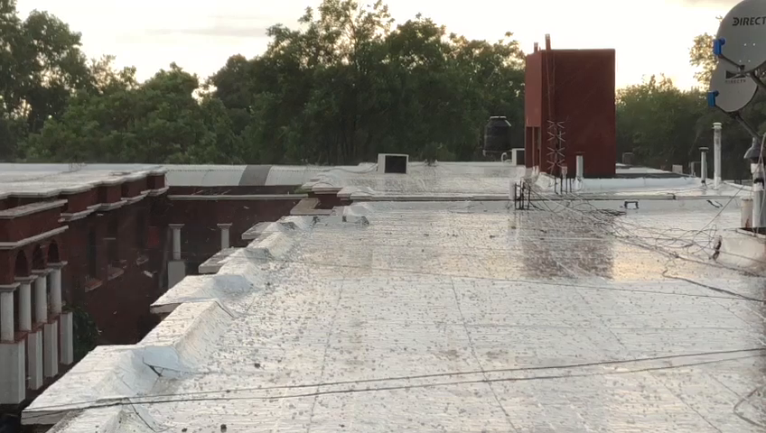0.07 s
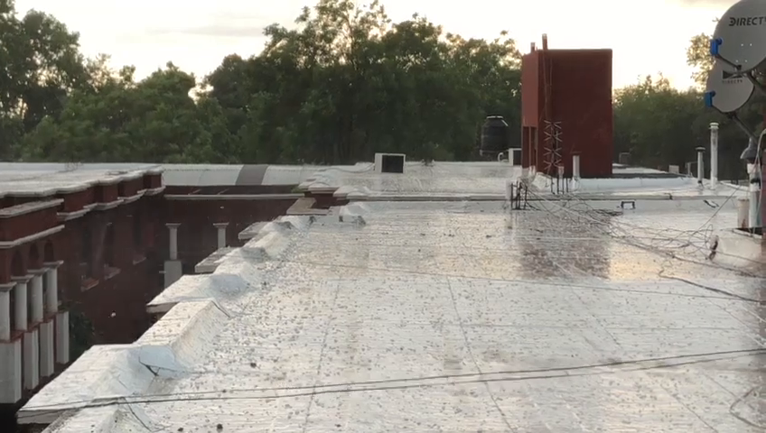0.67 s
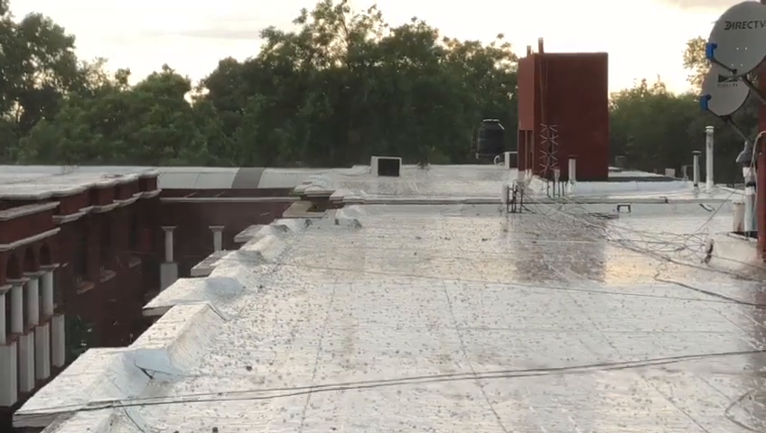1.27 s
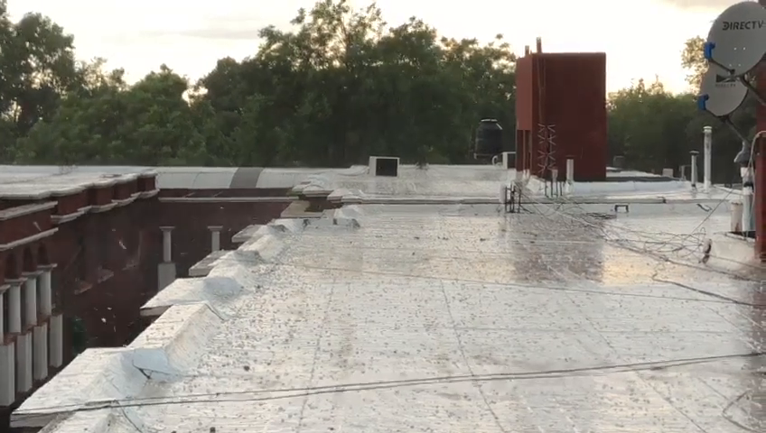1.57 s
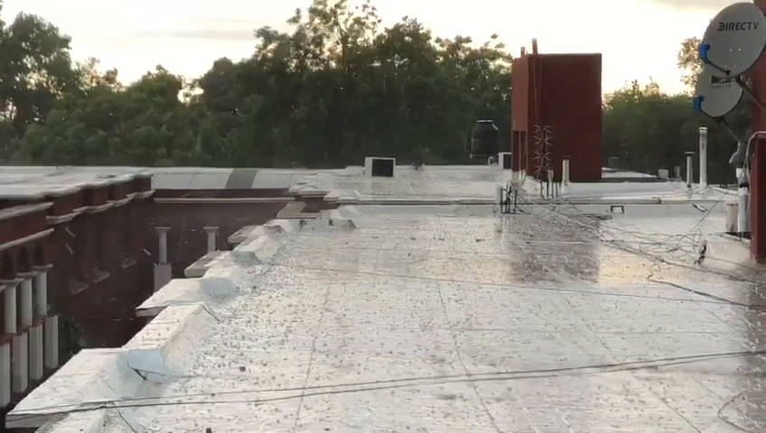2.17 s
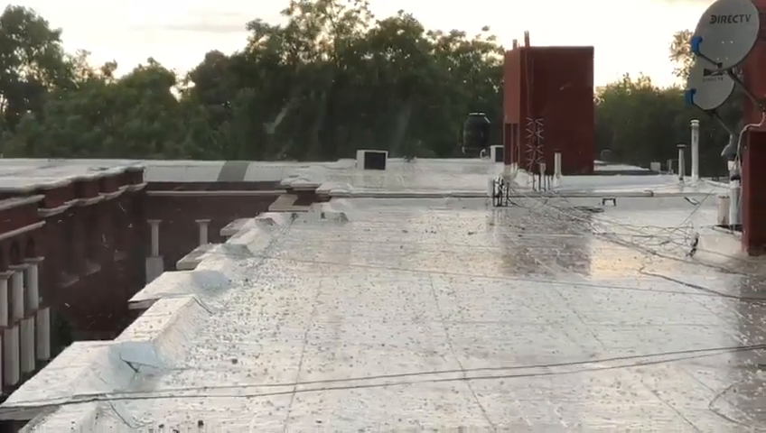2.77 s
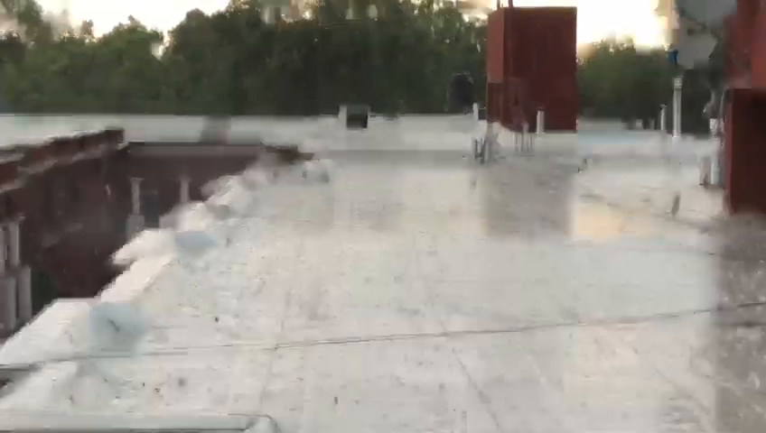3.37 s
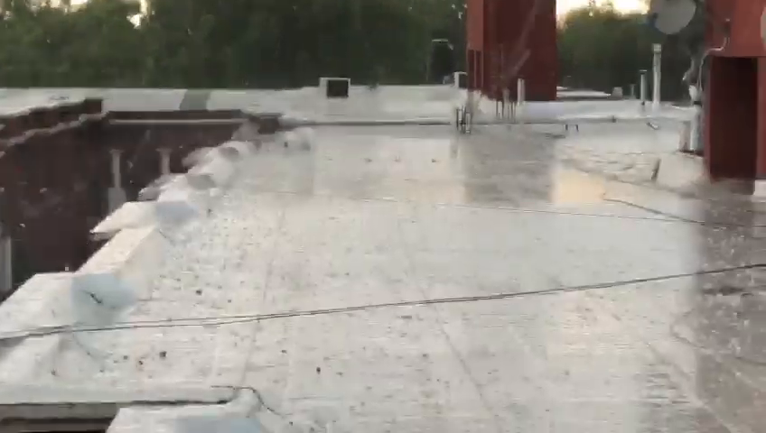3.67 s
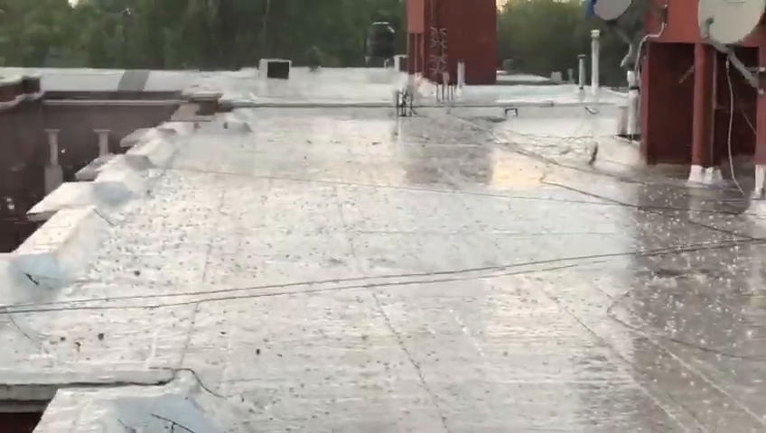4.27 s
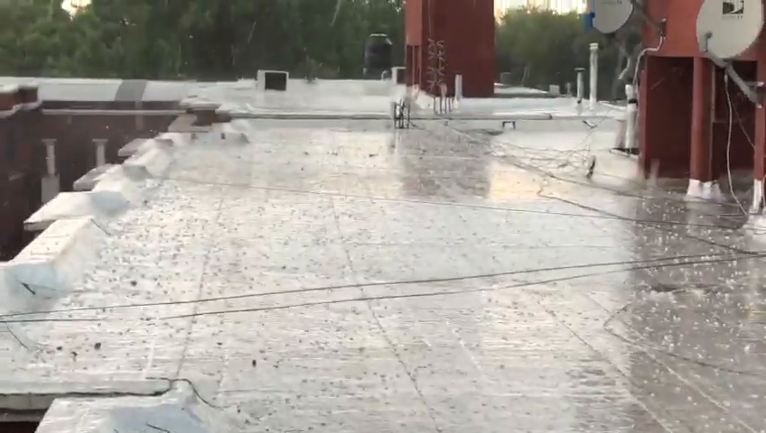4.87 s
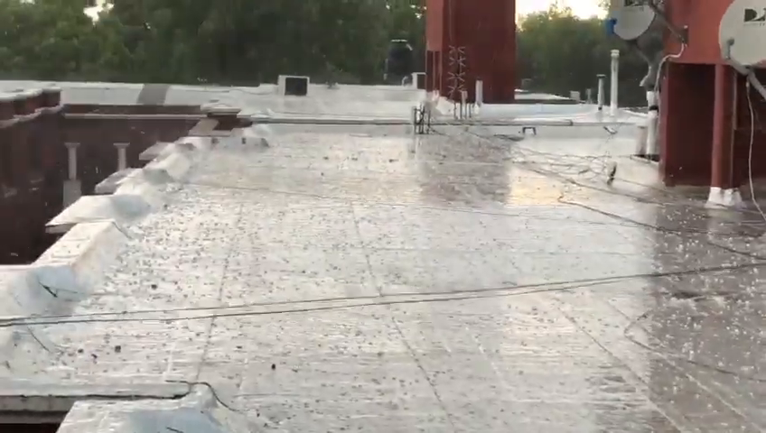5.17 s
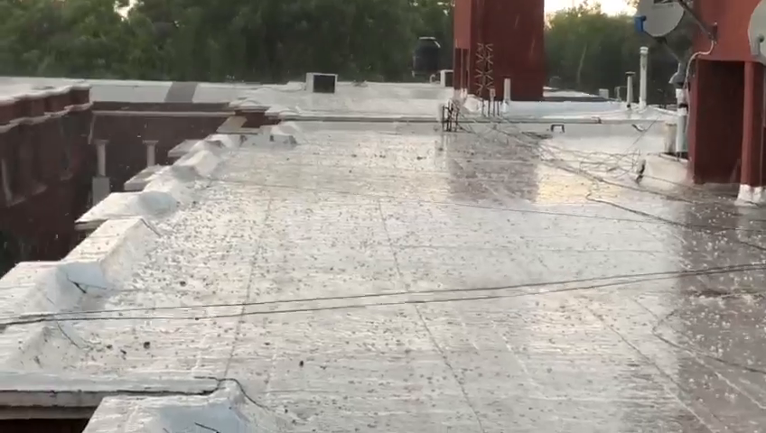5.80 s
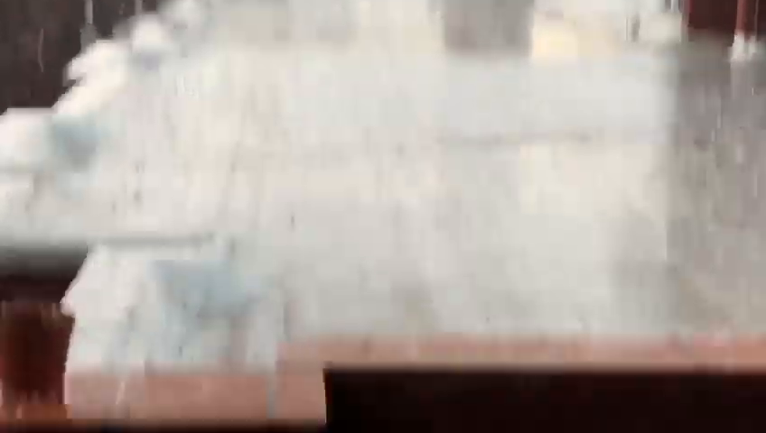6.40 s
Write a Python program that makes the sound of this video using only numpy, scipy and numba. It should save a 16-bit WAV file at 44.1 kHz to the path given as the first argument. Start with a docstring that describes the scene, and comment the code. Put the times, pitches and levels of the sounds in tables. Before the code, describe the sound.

Heavy rain and hail beat on a flat roof, with stones booming on thin sheet metal and wind buffeting the microphone.

```python
"""Heavy rain and hail on a flat roof, heard from shelter at its edge. From the start, far drops merge
into a wash, near ones patter and hailstones crack on the roofing; from 0.5 s big stones boom on a thin
metal sheet. At 1.8 s one clangs on a metal fitting. At 3.2-3.9 s the microphone turns, recolouring the
wash. Wind then buffets it, hardest near 4 s, and eases by 6 s. Gain control ducks after heavy blows."""
import sys
import numpy as np
from scipy import signal
from scipy.fft import rfft, irfft
from scipy.io import wavfile
from scipy.ndimage import uniform_filter1d, minimum_filter1d
from numba import njit

SR = 44100
rng = np.random.default_rng(int(sys.argv[2]) if len(sys.argv) > 2 else 0)


def master(y):
    """Save y as 16-bit WAV."""
    cut = np.clip(np.atleast_2d(y).T, -1, 1)
    pcm = np.round(cut * 32767)  # scale
    wavfile.write(sys.argv[1], SR, pcm.astype(np.int16))


N = 288414
TIME_S = np.arange(N) / SR
RING_S = np.arange(int(.55 * SR)) / SR  # time since a blow

# downpour strength: time_s, level_db
DOWNPOUR = [(0.3, -24), (0.7, -25), (1.05, -24), (1.5, -28.5), (2.2, -26), (2.6, -24), (3.3, -24.5),
            (3.8, -22.5), (4.55, -23), (5.55, -23.5), (6.15, -27), (6.54, -25.5)]
# microphone turn: time_s, turned_share
MIC_TURN = [(3.2, 0.15), (3.9, 0.63)]
# wash spectrum, microphone unturned: freq_hz, density_db
WASH_SPECTRUM = [(60, 8), (180, -1), (300, 1.5), (500, -1), (900, 1), (1400, -0.5), (2000, -1.5),
                 (2700, -2.5), (3700, -2), (5000, -9.5), (8000, -13), (12000, -23)]
# wash spectrum, microphone fully turned: freq_hz, density_db
WASH_TURNED_SPECTRUM = [(60, -19), (180, 8), (300, 7.5), (500, 1), (950, 2.5), (1400, -3), (2000, -6.5),
                        (2650, -1), (3700, -21), (5000, -18), (8000, -18), (12000, -20.5)]
# near spray spectrum: freq_hz, density_db
SPRAY_SPECTRUM = [(1000, -33), (3000, 0), (4500, 4.5), (7000, 0.5), (10000, -1), (12000, -7)]
# nearest stones on the roofing: start_s, level_db, pitch_hz, decay_s
ROOF_HITS = [(0.164, -6, 3900, 0.00045), (0.23, -12, 3200, 0.02), (0.402, -12.5, 5000, .002),
             (0.607, -12, 3000, 0.0053), (0.657, -8, 3630, 0.0055), (0.805, -10.5, 3470, .004),
             (1.018, -7, 4300, 0.0036), (1.042, -5.5, 4500, 0.0064), (1.110, -7, 4400, .004),
             (1.318, -1, 2760, 0.0021), (2.261, -4, 5040, .002), (3.046, -11, 4000, 0.038),
             (3.084, -25, 4500, 0.0034), (3.171, -8, 1970, 0.034), (3.431, -10, 2930, 0.014),
             (3.532, -4, 4300, 0.0033), (3.596, -10.5, 5630, 0.015), (3.921, -7, 3000, .014),
             (4.581, -6, 1910, 0.0083), (5.035, -9, 4170, 0.0026), (5.344, -8.5, 5000, 0.0005),
             (5.56, -10, 2620, 0.01), (5.691, -8, 4500, 0.011), (5.994, -8.5, 2610, 0.0026)]
# stones on the sheet: start_s, level_db, tilt_db_per_octave
SHEET_BLOWS = [(0.485, -15.5, -0.2), (0.975, -7.5, -3), (1.157, -6.5, -3), (2.406, -6.5, -2),
               (2.795, -11.5, 0.5), (3.022, -16.5, -4), (3.797, -6.5, -1.5), (4.094, -11, -2),
               (4.198, -13, 0), (4.906, -11.5, 0), (5.062, -17, 0.5), (5.298, -12.5, -0.2),
               (5.574, -6.5, -4.5), (5.717, -7, -1.5), (5.974, -16.5, -1), (5.995, -13, -2),
               (6.454, -16, -2)]
# spectrum of the sheet's crowded modes: freq_hz, density_db
SHEET_SPECTRUM = [(80, -20), (130, -3), (180, -16.5), (240, 2), (340, -3.5), (480, -6.5), (620, -7),
                  (800, -9.5), (1250, -11), (2000, -20.5), (4000, -27), (8000, -29)]
# strongest sheet modes: freq_hz, level_db
SHEET_MAIN_MODES = [(131, -2.5), (224, 1), (243, 2.5), (256, 4), (286, -28), (317, -4), (329, 2), (369, -2),
                    (403, -3), (453, -5), (520, -6.5), (691, -4.5)]
# fitting modes: freq_hz, level_db, t60_s
CLANG_MODES = [(238.4, -0.5, 0.87), (344, -2, 0.45), (355, -4, 0.57), (719, -8, 1.28), (1320, -14, 0.38),
               (1313, -8, 0.61), (1400, -8, 0.68), (1574, -6, 0.38), (1776, -5, 0.54), (2500, -12.5, 0.64),
               (2627, -11, 0.47), (3220, -10, 0.56), (3690, 5.5, 0.077), (3990, -1, 0.26), (4310, -8, 0.34),
               (5243, -23, 0.32), (6072, -12, 0.47), (6228, -17, 0.35), (7400, -21, .22), (8150, -16, 0.38)]
# low rumble, thump of heavy sheet blows near 1.1 s, wind gusts later: time_s, level_db
RUMBLE_LEVEL = [(0.2, -33.5), (0.9, -33.5), (1.08, -24), (1.6, -33), (2.3, -30.5), (2.9, -26), (3.4, -32),
                (3.72, -14.5), (4.05, -11), (4.68, -19), (4.8, -10.5), (5.25, -19), (5.6, -15), (5.9, -24),
                (6.54, -27.5)]
# low rumble spectrum: freq_hz, density_db
RUMBLE_SPECTRUM = [(15, -12), (30, -1.5), (55, 1), (90, -1), (130, 0), (180, -11.5), (300, -18), (800, -47)]
# hardest buffet: centre_s, level_db, pitch_hz, half_length_s
HARD_BUFFET = (4.05, -1, 70, .05)


def rain(wash_db=3, flicker_db=.8, near_db=-10, near_growth=.67, usual_db=-23, near_turned_db=2.5):
    """Far drops merge into a wash, near ones spit and patter, small hail ticks; all follow the downpour."""
    level_db = curve(DOWNPOUR)
    turn = curve(MIC_TURN)
    near_level_db = level_db + near_db + near_growth * (level_db - usual_db) + near_turned_db * turn
    far_drops = shower(per_s=9000, spread_db=1.35)
    wash = (1 - turn) * coloured(far_drops, WASH_SPECTRUM)
    wash += turn * coloured(far_drops, WASH_TURNED_SPECTRUM)
    wash *= undb(wash_db + flicker_db * walk(14))
    spray = coloured(shower(per_s=5000, spread_db=2.1), SPRAY_SPECTRUM) * undb(4 * walk(25))
    drops = undb(-3) * patter(700, 3400, per_s=700, spread_db=3.2, decay_s=.0025, octaves=1)
    pellets = undb(-4) * patter(3500, 9000, per_s=200, spread_db=5.2, decay_s=.0003, octaves=2.2)
    far_hail = undb(-15) * patter(2900, 6600, per_s=18, spread_db=2, decay_s=.002, octaves=1.4, spots=5)
    return undb(level_db) * (wash + drops + far_hail) + undb(near_level_db) * (spray + pellets)


def patter(low_hz, high_hz, per_s, spread_db, decay_s, octaves, spots=12):
    """Drops or stones land on many spots, each with its own pitch; rms 1."""
    ticks = [unit(impact(hz, decay_s, octaves, splash_db=-26, splash_s=.008, snap=1.5))
             for hz in np.geomspace(low_hz, high_hz, spots)]
    return unit(sum(signal.oaconvolve(shower(per_s / spots, spread_db), tick)[:N] for tick in ticks))


def shower(per_s, spread_db):
    """Randomly timed impulses: many faint, a few strong."""
    lands = rng.random(N) < per_s / SR
    size = undb(spread_db * np.minimum(rng.exponential(size=N), 4.5))
    return lands * size * rng.choice([-1, 1], N)


def impact(hz, decay_s, octaves, splash_db, splash_s, snap=3.8, order=2):
    """Hard snap and noise burst with a fainter splash tail; peak 1."""
    t = RING_S[:SR // 10]
    envelope = np.exp(-t / decay_s) + undb(splash_db) * np.exp(-t / splash_s)
    force = rng.standard_normal(len(t)) * envelope
    force[:2] += 2 * snap
    tick = band(force, hz, octaves, order)
    return tick / np.abs(tick).max()


def roof_cracks(body_db=5, shatter_db=-7):
    """Hailstones shatter on the roofing; the longer the ring, the narrower the band."""
    out = np.zeros(N)
    for start_s, level_db, pitch_hz, decay_s in ROOF_HITS:
        octaves = 1.95 * (.001 / decay_s) ** .22
        body = impact(pitch_hz, decay_s, octaves, splash_db=-12, splash_s=.054)
        shatter = impact(8000, .87 * decay_s, octaves=2.3, splash_db=-5, splash_s=.012, snap=1.4, order=1)
        add(out, start_s, undb(level_db + body_db) * body + undb(level_db + shatter_db) * shatter)
    return out


def sheet(slap_db=3.5, tick_db=8, boom_s=.071, boom_ref_db=-9, doubling_db=11.5):
    """Big stones tick, slap the thin sheet and set it booming; heavier is longer, harder is brighter."""
    out = np.zeros(N)
    for start_s, level_db, tilt_db_per_octave in SHEET_BLOWS:
        length_s = boom_s * 2 ** ((level_db - boom_ref_db) / doubling_db)
        contact_db = level_db + 1.5 * tilt_db_per_octave
        add(out, start_s, undb(level_db) * boom(tilt_db_per_octave, length_s))
        add(out, start_s, undb(contact_db + slap_db) * slap())
        ice_tick = impact(2300, decay_s=.0042, octaves=3.2, splash_db=-14, splash_s=.018)
        add(out, start_s, undb(contact_db + tick_db) * ice_tick)
    return out


def boom(tilt_db_per_octave, length_s, modes_db=-3, return_s=.008):
    """Waves return from the sheet's edges and ring in its crowded modes."""
    centres_hz = 90 * 2 ** (np.arange(19) / 3)
    density_db = spectrum_db(SHEET_SPECTRUM, centres_hz) + tilt_db_per_octave * np.log2(centres_hz / 400)
    weights = undb(density_db) * np.sqrt(centres_hz)
    weights /= np.linalg.norm(weights)
    crowd = sum(weight * band_noise(hz, octaves=1 / 3) * bending_envelope(hz, length_s)
                for hz, weight in zip(centres_hz, weights))
    # the landing spot sets each mode's phase
    modes = sum(undb(db) * random_phase_sine(hz) * bending_envelope(hz, length_s)
                for hz, db in SHEET_MAIN_MODES)
    onset = 1 - np.exp(-(RING_S / return_s) ** 2)
    return onset * (crowd + undb(modes_db) * modes / 2)


def bending_envelope(hz, length_s, tail_db=-14, tail_t60_s=1):
    """Low bending waves travel slowly, so they come late and stay."""
    lowness = 300 / hz
    rise_s = min(.017 * lowness ** 4.5, .04)
    decay_s = 1.28 * length_s * lowness ** .17
    swell = 1 - np.exp(-RING_S / rise_s)
    body = np.exp(-(RING_S / decay_s) ** 1.25)
    return swell * (body + undb(tail_db) * fade(tail_t60_s))


def slap(hz=780, length_s=.0066):
    """First bending wave from the dent: highs outrun lows, so the pitch falls fast."""
    glide_hz = hz * (.00365 / (RING_S + .00061)) ** .365
    wave = np.sin(2 * np.pi * np.cumsum(glide_hz) / SR)
    grit = .8 * band_noise(1.4 * hz, octaves=2.2)
    return (wave + grit) * np.exp(-(RING_S / length_s) ** 2)


def clang(start_s=1.811, level_db=-13.5, ring_db=2, rough_db=2.9, crash_db=-2.5, shudder_db=5):
    """A stone hits a metal fitting: rattling modes, a bright crash, a dull shudder of the mount."""
    ring = 0
    for hz, mode_db, t60_s in CLANG_MODES:
        beating_pair = random_phase_sine(hz) + .5 * random_phase_sine(hz + rng.uniform(-25, 23.7))
        rattle_db = rough_db * walk(148, len(RING_S))
        swell = 1 - np.exp(-RING_S * hz / 14)
        ring += undb(mode_db + ring_db + rattle_db) * swell * fade(t60_s) * beating_pair
    crash = band_noise(4400, octaves=1.4, order=1) * fade(t60_s=.32)
    crash *= undb(crash_db + rough_db * walk(200, len(RING_S)))
    shudder = band_noise(260, octaves=2.4, order=1) * fade(t60_s=.71)
    shudder *= undb(shudder_db) * (1 - np.exp(-RING_S / .02))
    out = np.zeros(N)
    add(out, start_s, undb(level_db) * (ring + crash + shudder))
    return out


def low_rumble(trim_db=-1.5, flutter_db=2.6):
    """Fluttering low noise: thump of heavy sheet blows near 1.1 s, wind on the microphone later."""
    noise = coloured(rng.standard_normal(N), RUMBLE_SPECTRUM)
    noise /= np.sqrt(uniform_filter1d(noise ** 2, size=SR // 12))
    return noise * undb(curve(RUMBLE_LEVEL) + trim_db + flutter_db * walk(12))


def wind_buffet():
    """One hard gust sheds eddies at the microphone: a brief, wavering low tone."""
    centre_s, level_db, pitch_hz, half_length_s = HARD_BUFFET
    shedding_hz = pitch_hz * (1 + .17 * walk(60))
    shedding = np.sin(2 * np.pi * np.cumsum(shedding_hz) / SR)
    swell = np.exp(-((TIME_S - centre_s) / half_length_s) ** 2)
    return undb(level_db) * shedding * swell


def undb(db):
    """Decibels to gain."""
    return 10 ** (np.asarray(db) / 20)


def unit(x):
    """Scale to rms 1."""
    return x / np.sqrt(np.mean(x ** 2))


def fade(t60_s):
    """Exponential decay after a blow."""
    return undb(-60 * RING_S / t60_s)


def random_phase_sine(hz):
    """One undamped mode."""
    return np.sin(2 * np.pi * (hz * RING_S + rng.random()))


def curve(table):
    """Control table at every sample."""
    return np.interp(TIME_S, *np.transpose(table))


def spectrum_db(spectrum, hz):
    """Spectrum read on a log-frequency axis."""
    freq_hz, density_db = np.transpose(spectrum)
    return np.interp(np.log(np.maximum(hz, 1)), np.log(freq_hz), density_db)


def coloured(x, spectrum):
    """Filter by a spectrum; rms 1."""
    hz = np.linspace(0, SR / 2, len(x) // 2 + 1)
    return unit(irfft(rfft(x) * undb(spectrum_db(spectrum, hz)), len(x)))


def band(x, hz, octaves, order):
    """Causal band-pass around a centre."""
    edges_hz = np.minimum(hz * 2 ** (np.array([-.5, .5]) * octaves), [SR / 3, SR / 2 - 1000])
    return signal.sosfilt(signal.butter(order, edges_hz, "band", fs=SR, output="sos"), x)


def band_noise(hz, octaves, order=2):
    """Band of noise for one blow; rms 1."""
    return unit(band(rng.standard_normal(len(RING_S)), hz, octaves, order))


def walk(rate_hz, size=N):
    """Smooth random wander; rms 1."""
    step = int(SR / rate_hz)
    stairs = np.repeat(rng.standard_normal(size // step + 1), step)
    return unit(uniform_filter1d(stairs, step)[:size])


def add(out, start_s, x):
    """Mix x in at start_s."""
    i = int(start_s * SR)
    out[i:i + len(x)] += x[:max(N - i, 0)]


@njit
def follow(x, attack_s, release_s):
    """One-pole attack/release follower."""
    out, state = np.empty(len(x)), 0.
    for i in range(len(x)):
        state += (x[i] - state) / (SR * (attack_s if x[i] > state else release_s))
        out[i] = state
    return out


def scene():
    """All the weather at one microphone."""
    return (rain() + roof_cracks() + sheet() + clang() + low_rumble() + wind_buffet())[None]


def record(dry, open_s=.159, low_hz=36, top_hz=11600, threshold_db=-15.5, duck_share=.4, ceiling=.85):
    """Low cut, microphone opening, gain control, peak limiter, top cut."""
    x = signal.sosfilt(signal.butter(3, low_hz, "high", fs=SR, output="sos"), dry[0])
    x *= TIME_S >= open_s
    level_db = 10 * np.log10(np.abs(uniform_filter1d(x ** 2, size=SR // 50)) + 1e-12)
    excess_db = np.maximum(level_db - threshold_db, 0)
    x *= undb(-duck_share * follow(excess_db, attack_s=.19, release_s=.91))
    hold = SR // 250
    limiter_gain = ceiling / np.maximum(np.abs(x), ceiling)
    x *= uniform_filter1d(minimum_filter1d(limiter_gain, hold), hold)
    return signal.sosfilt(signal.ellip(10, .2, 80, top_hz, fs=SR, output="sos"), x)[None]


dry = scene()
out = record(dry)
master(out)
```